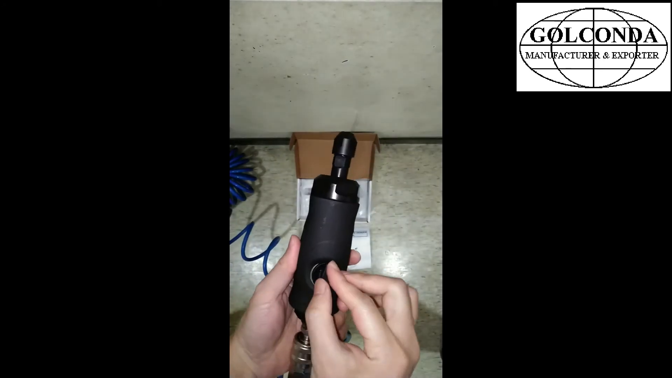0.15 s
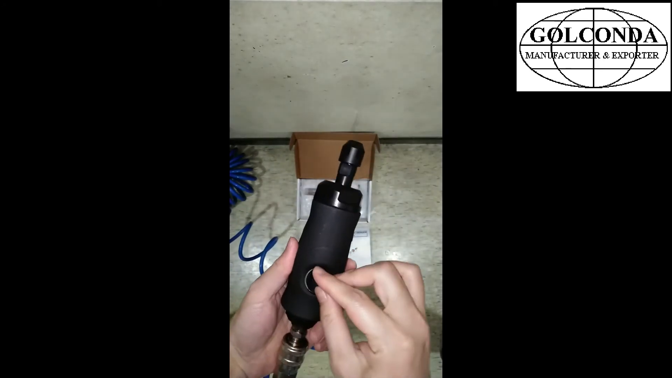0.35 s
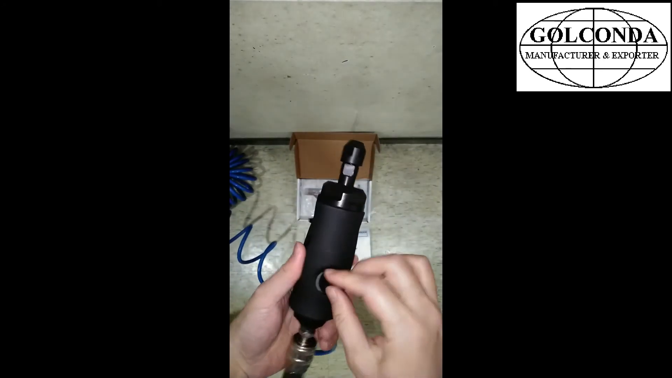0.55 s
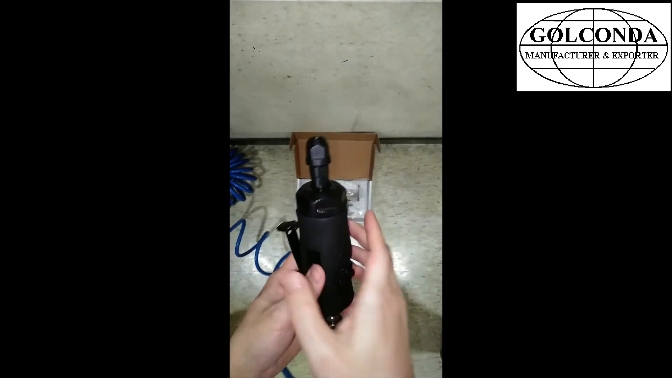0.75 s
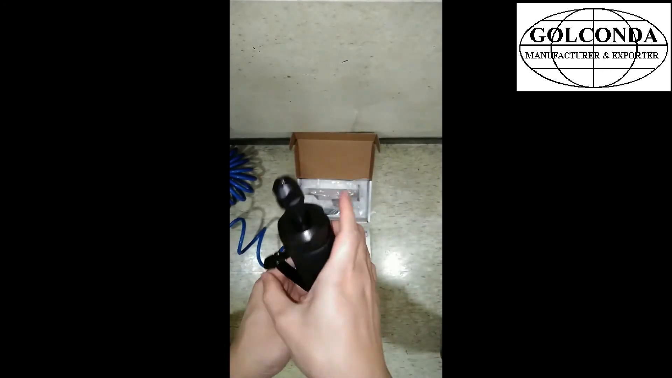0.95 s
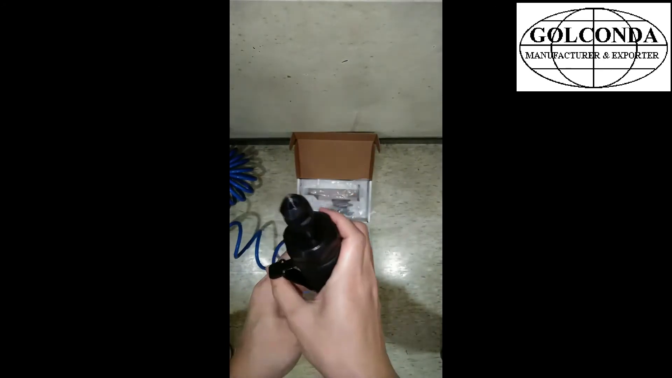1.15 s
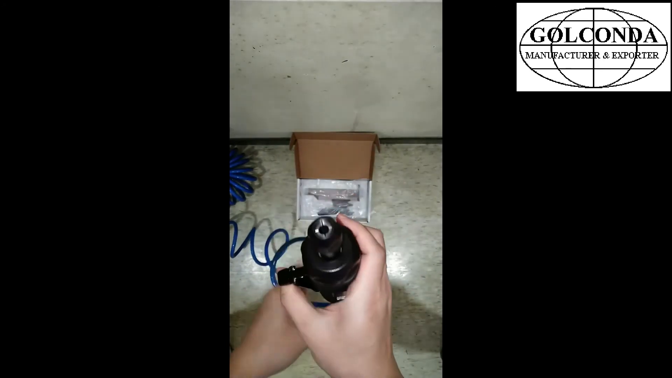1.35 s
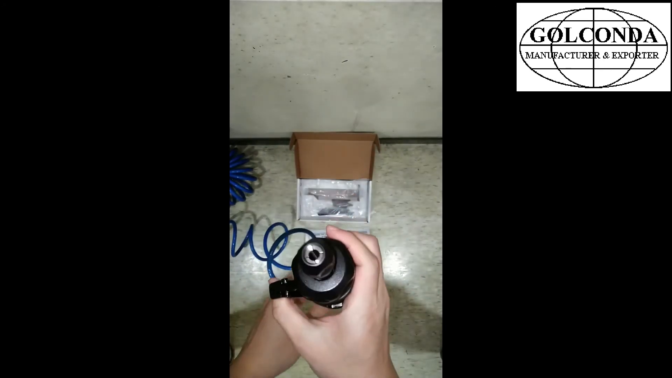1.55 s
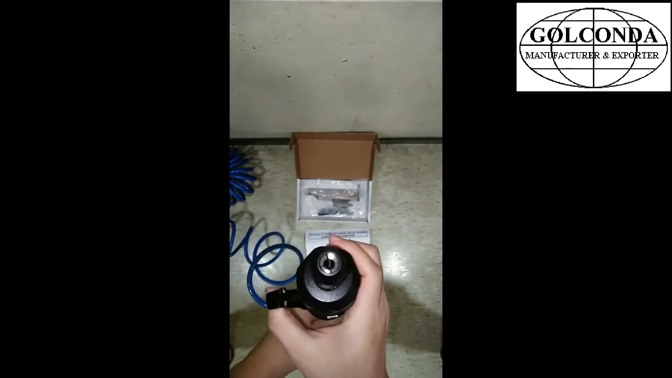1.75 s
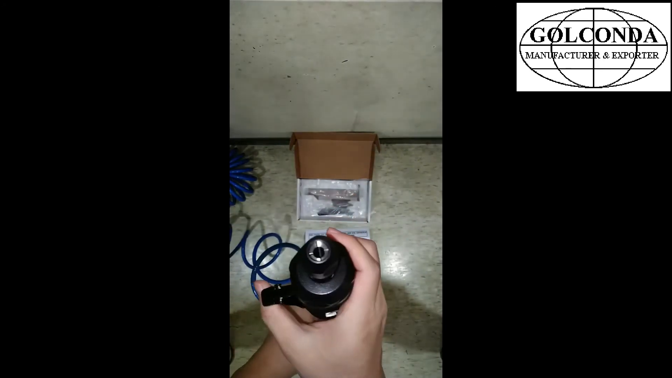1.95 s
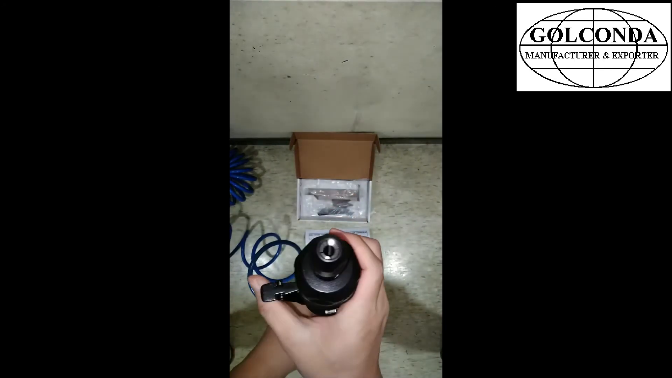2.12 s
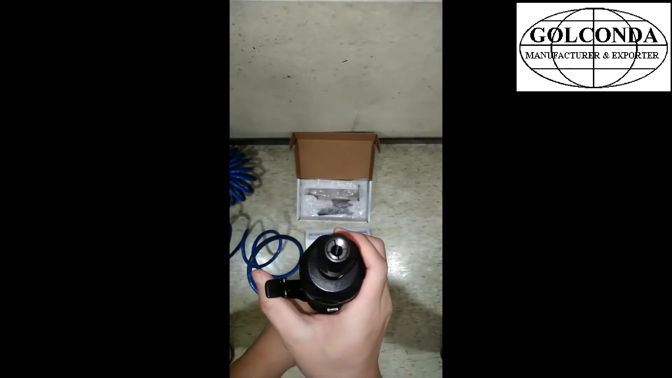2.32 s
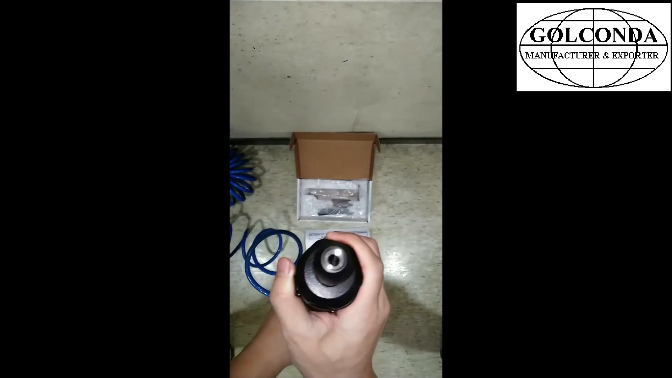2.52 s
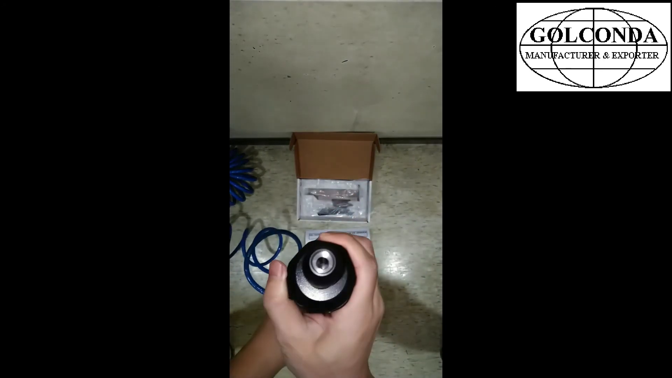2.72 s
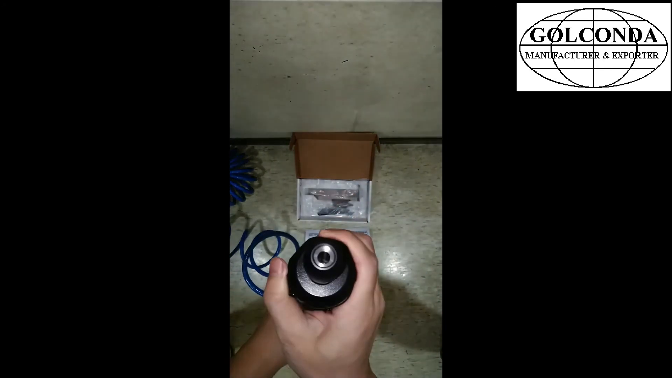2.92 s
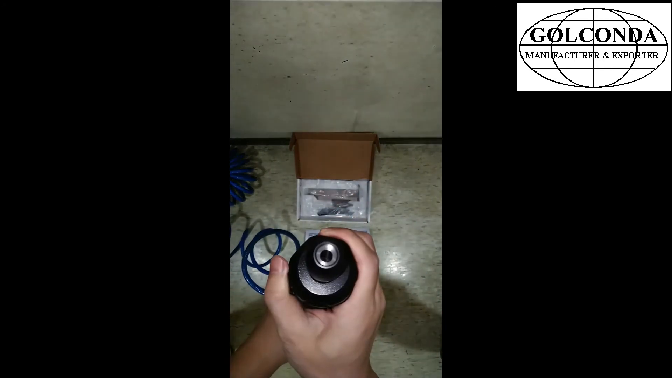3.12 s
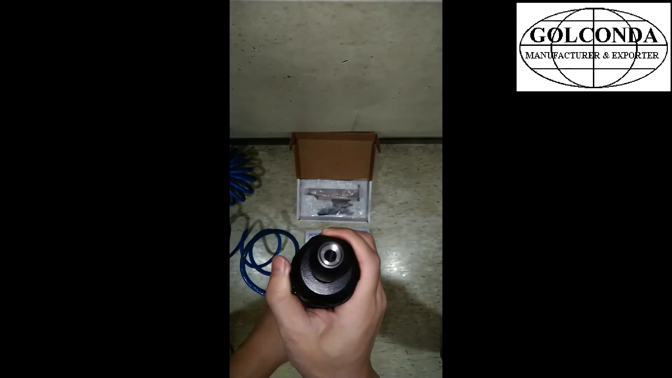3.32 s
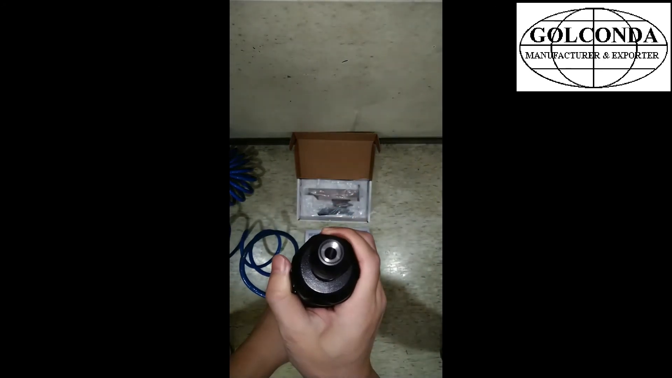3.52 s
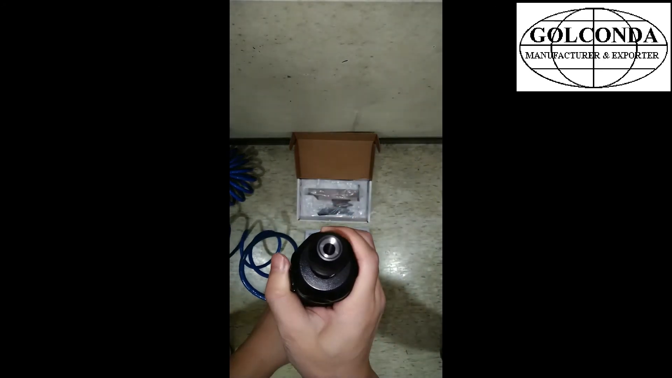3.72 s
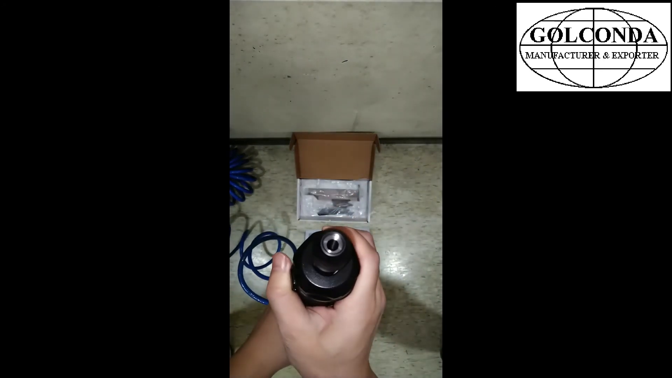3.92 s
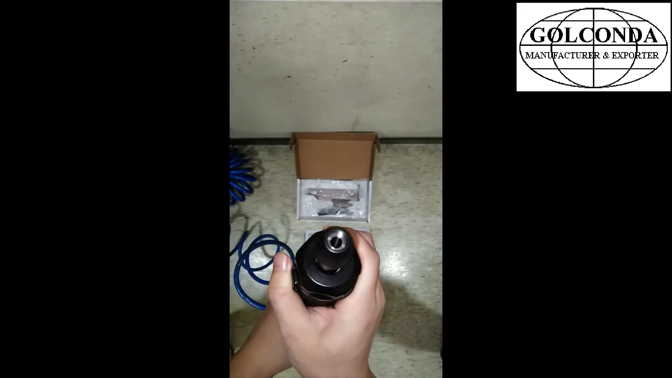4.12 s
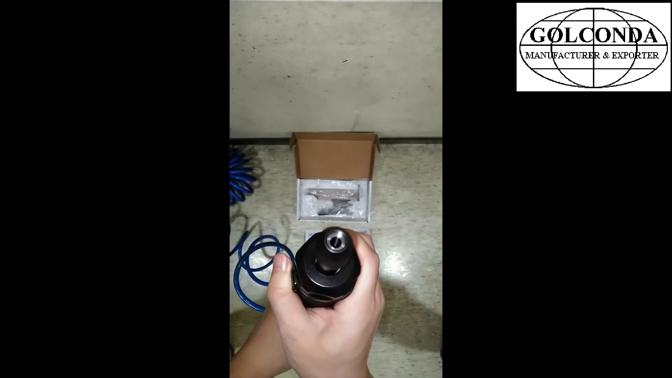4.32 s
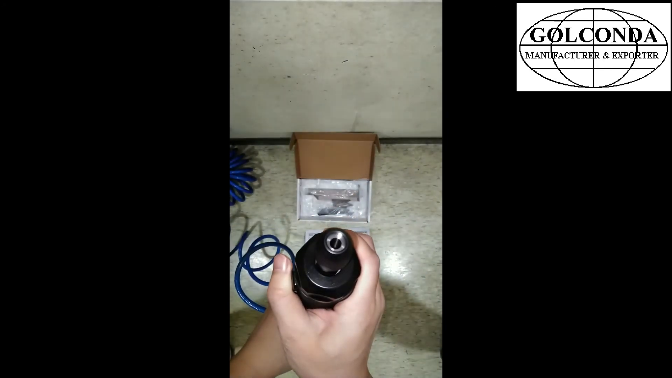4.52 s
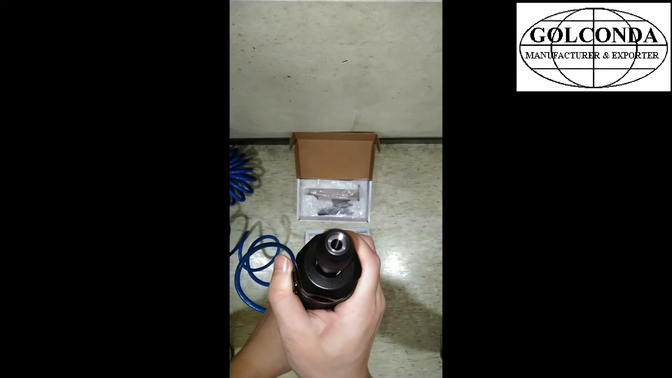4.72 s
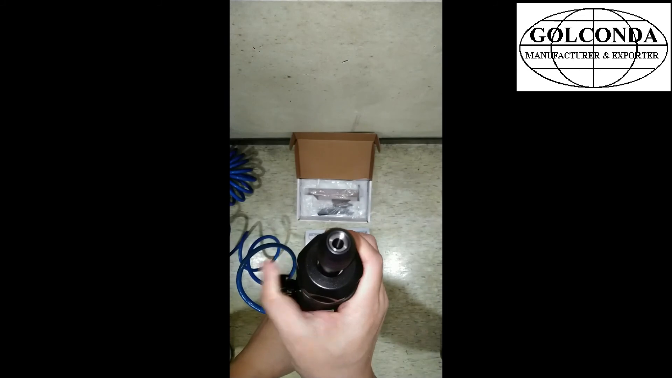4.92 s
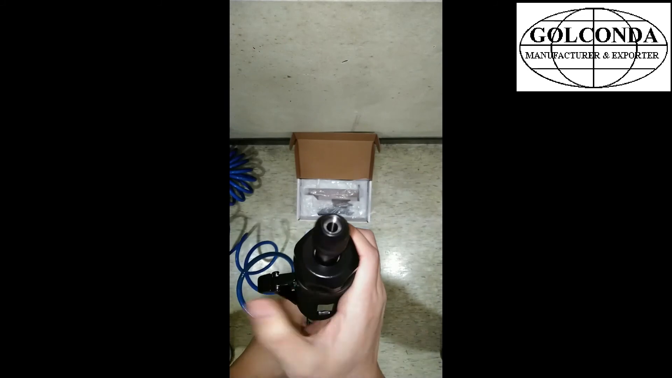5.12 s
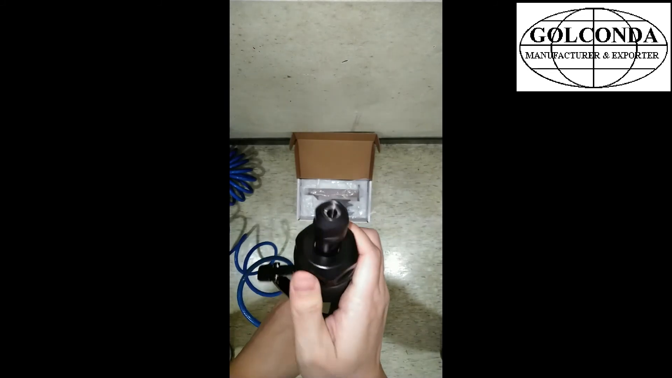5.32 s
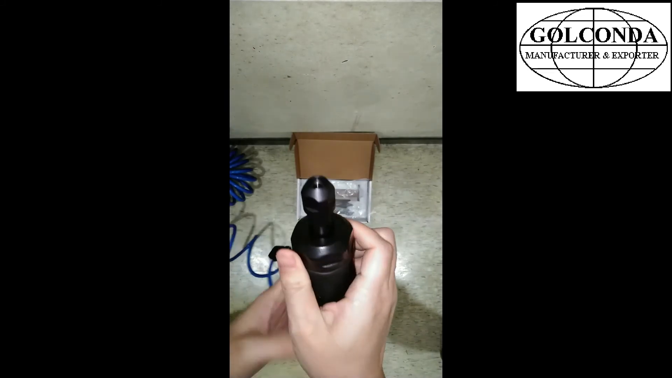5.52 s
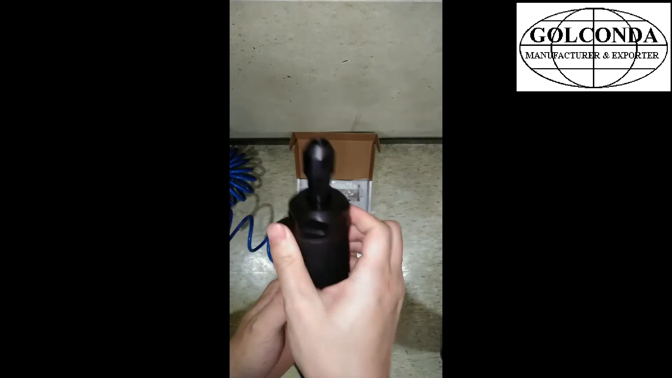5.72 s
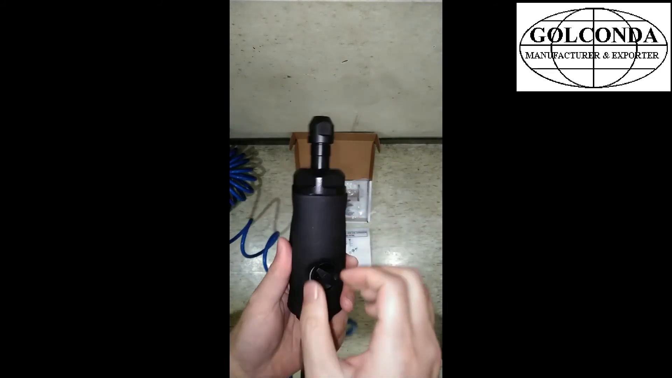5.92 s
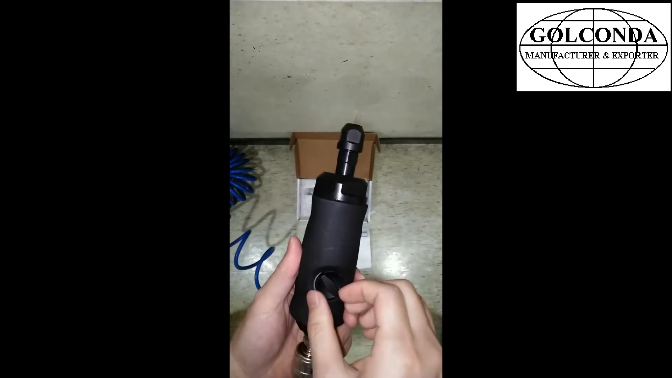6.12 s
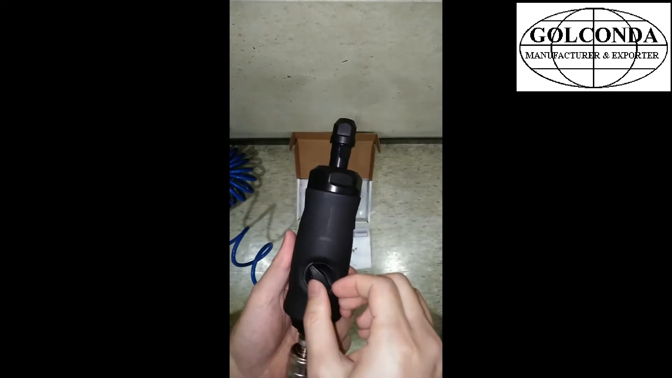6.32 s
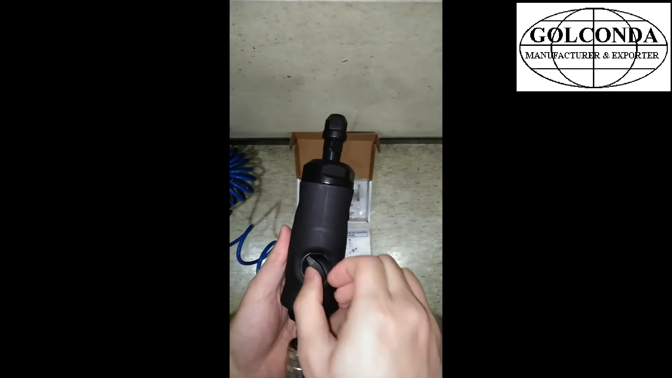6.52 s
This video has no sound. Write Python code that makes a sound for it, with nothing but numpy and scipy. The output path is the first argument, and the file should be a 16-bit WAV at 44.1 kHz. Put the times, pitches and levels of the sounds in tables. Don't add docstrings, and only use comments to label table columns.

```python
import sys
import numpy as np
from scipy import signal
from scipy.fft import rfft, irfft
from scipy.io import wavfile
from scipy.ndimage import uniform_filter1d

SR = 44100
rng = np.random.default_rng(int(sys.argv[2]) if len(sys.argv) > 2 else 0)


def gain_from_decibels(decibels):
    exponent = np.asarray(decibels, float) / 20
    return 10 ** exponent


def store_wav(level_fs):
    pcm = np.round(np.clip(np.atleast_2d(level_fs), -1, 1) * 32767)
    wavfile.write(sys.argv[1], SR, pcm.T.astype(np.int16))


N = 293596
TIME = np.arange(N) / SR
VANES = 4

# time_s, level_db
LEAK_LEVEL = [(0.0, -63.5), (0.53, -64), (0.8, -67), (2.23, -70), (2.4, -67.5), (5.3, -64.5), (5.43, -74),
              (5.68, -67.5), (5.96, -62), (6.45, -64.5), (6.66, -61.5)]
# pitch_hz, density_db
LEAK_COLOUR = [(2350, -44), (4000, -30), (5370, -14), (6800, -11.5), (7590, -9), (9290, -5.5), (11100, 1.5),
               (12800, -5.5), (15900, -5.5)]
# pitch_hz, density_db
RUMBLE_COLOUR = [(12, -16), (20, 1), (114, -9.5), (155, -8), (216, -11.5), (245, -11), (300, -19),
                 (341, -16), (476, -21), (615, -21), (814, -23), (3500, -37.5), (9000, -44.5), (11700, -67),
                 (19800, -120)]
# start_s, peak_db, centre_hz, width_hz, t60_s
TICKS = [(.615, -64, 9000, 8000, .03), (1.683, -45.5, 7000, 4000, 0.019), (1.684, -54.5, 6900, 3500, 0.17),
         (1.682, -57, 2600, 2400, .03), (2.438, -47, 800, 2000, 0.022), (5.043, -21.5, 8200, 1000, 0.05),
         (5.044, -20.5, 12400, 1507, 0.045), (5.043, -30, 5000, 5000, .06), (5.05, -29, 11000, 9000, 0.24),
         (5.57, -66, 9050, 6000, 0.034), (5.8, -58.5, 11000, 8040, .04)]
# pitch_hz, density_db
GRIP_COLOUR = [(20, -3), (48, 7), (90, -10), (200, -31)]
# time_s, level_db
AIR_ON = [
    (2.415, -63),
    (2.436, -27),
    (2.46, -23.5),
    (2.56, -23.5),
    (2.68, -27.5),
    (3.25, -26.3),
    (3.6, -28.3),
    (4.94, -28.5),
]
# time_s, level_db
AIR_OFF = [
    (4.975, -27.5),
    (5.001, -25),
    (5.012, -29),
    (5.022, -29),
    (5.033, -32),
    (5.046, -29),
    (5.07, -48),
    (5.1, -54),
    (5.14, -79),
]
# peak_s, first_tone_db, second_tone_db, thump_db, fall_db_per_s
SURGES = [
    (2.459, -19.5, -24, -41, 1700),
    (2.472, -27, -38, -28, 700),
    (2.485, -27, -35.5, -38, 150),
    (2.535, -28, -43, -61, 550),
    (5.001, -15.5, -15.5, -24, 560),
    (5.023, -23, -25.5, -24, 380),
    (5.045, -23, -31, -33, 520),
]
# pitch_hz, width_hz, depth_db
NULLS = [(770, 7, 6), (841, 22, 9), (1534, 16, 28), (1632, 22, 20), (1658, 17, 18), (2300, 25, 8),
         (3040, 30, 12), (3915, 30, 15), (4600, 80, 15), (5410, 20, 15), (7600, 50, 18), (5300, 12, 10),
         (9560, 70, 14), (9850, 60, 10)]
# vane_rate_multiple, level_db
SETTLED_OVERTONES = [(1, 0), (2, -3), (3, -17), (4, -7), (5, -13), (6, -11), (7, -7), (8, -4), (9, -17),
                     (10, -15), (11, -9), (12, -12), (13, -10), (14, -7), (15, -15), (16, -12), (17, -18),
                     (18, -19)]
# vane_rate_multiple, level_db
PEAK_OVERTONES = [(1, -3), (2, 0), (3, -10), (4, -10), (5, -16), (6, -12), (7, -12), (8, -15), (9, -28),
                  (10, -16), (11, -9), (12, -6), (13, -5), (14, -18), (15, -15), (16, -19), (17, -11),
                  (18, -15)]
OVERTONE_RATES = [770, 815]
# shaft_rate_multiple, level_db
SHAFT_RATTLE = [(1, -23.5), (2, -36.5), (3, -43.5), (5, -28.5), (6, -21.5), (7, -19.5), (9, -24.5),
                (10, -22.5), (11, -27.5), (13, -14.5), (14, -14.5), (15, -18.5)]
# pitch_hz, level_db
RATTLE_COLOUR = [(2500, -24.5), (3300, -21), (4500, -22), (7500, -15), (8800, -12.5), (10500, -6),
                 (12500, -13.5), (14000, -10), (15700, -24)]
# pitch_hz, density_db
HISS_COLOUR = [(150, -28), (400, -29), (620, -34), (900, -30.5), (1300, -23.5), (1800, -27.5), (2600, -22),
               (4200, -22), (6200, -17), (7600, -20), (10600, -9.5), (14700, -17.5), (15300, -21.5),
               (15900, -11.5)]
# pitch_hz, width_hz, level_db
PIPE = [(1681, 250, -8), (2090, 480, -2), (3460, 150, -15.5), (4278, 60, -7.5), (5020, 360, -9.5),
        (5790, 450, -7.5), (7203, 150, -15), (7900, 250, -15.5), (10500, 1200, -4.5), (5000, 6550, 0.5),
        (13500, 6000, -3.5)]


def lookup(spectrum, hz):
    f, db = np.transpose(spectrum)
    return np.interp(np.log(hz + 1), np.log(f), db, left=-90, right=-90)


def coloured(x, spectrum):
    y = irfft(rfft(x) * gain_from_decibels(lookup(spectrum, np.fft.rfftfreq(len(x), 1 / SR))), len(x))
    return y / np.sqrt(np.mean(y ** 2))


def band(x, hz, width_hz):
    return signal.lfilter(*signal.iirpeak(min(hz, .4 * SR), hz / width_hz, SR), x)


def double_band(x, hz, width_hz):
    y = band(band(x, hz, width_hz), hz, width_hz)
    return y / np.std(y)


def walk(rate_hz, size):
    knots = rng.standard_normal(int(size * rate_hz / SR) + 2)
    return 1.015 * np.interp(np.arange(size) * rate_hz / SR, np.arange(len(knots)), knots)


def patchy(x, depth_db, cells, hole_db=0.):
    z = signal.stft(x, nperseg=1024)[2]
    field = rng.standard_normal(z.shape)
    field = uniform_filter1d(field, cells[0], axis=0)
    field = uniform_filter1d(field, cells[1], axis=1)
    field = field / np.std(field)
    gain = gain_from_decibels(depth_db * field + hole_db * (field < -1))
    gain = gain / np.sqrt(np.mean(gain ** 2))
    return signal.istft(z * gain, nperseg=1024)[1][:len(x)]


def leak():
    s, db = np.transpose(LEAK_LEVEL)
    hiss = coloured(rng.standard_normal(N), LEAK_COLOUR)
    return gain_from_decibels(np.interp(TIME, s, db)) * patchy(hiss, 2.0, (24, 20))


def rumble():
    return gain_from_decibels(-56 + 0.32 * walk(3.1, N)) * coloured(rng.standard_normal(N), RUMBLE_COLOUR)


def ticks():
    out = np.zeros(N)
    age = np.arange(8000) / SR
    for s, db, hz, width_hz, t60 in TICKS:
        i = int(s * SR)
        knock = double_band(rng.standard_normal(len(age)), hz, width_hz)
        out[i:i + len(age)] += gain_from_decibels(db - 60 * age / t60) * knock
    return out


def grip():
    from_s, to_s, edge_db_per_s = 1.8, 2.4, 80
    outside_s = np.clip(np.maximum(from_s - TIME, TIME - to_s), 0, None)
    return gain_from_decibels(-58.5 - edge_db_per_s * outside_s) * coloured(rng.standard_normal(N), GRIP_COLOUR)


def speed():
    wind_up_s, wind_up_tau_s = 2.4705, .0182
    sag_from_s, sag_tau_s = 2.665, .42
    release_s, coast_half_s = 4.972, .06
    settled_hz, overshoot_hz, creep_hz_per_s = 763.0, 78.0, 2.5
    since = np.clip(TIME - sag_from_s, 0, None)
    fresh = np.exp(-since / sag_tau_s)
    wind_up = 1 / (1 + np.exp(-(TIME - wind_up_s) / wind_up_tau_s))
    coast = 1 / (1 + (np.clip(TIME - release_s, 0, None) / coast_half_s) ** 2)
    share = wind_up * coast
    full_hz = settled_hz + overshoot_hz * fresh - creep_hz_per_s * since
    return share * full_hz, fresh, 1 - share


def air_flow():
    s, db = np.transpose([*AIR_ON, *AIR_OFF])
    return np.interp(TIME, s, db, left=-120, right=-120)


def exhaust(angle, air_db, roar_db):
    size = len(angle)
    gust = 1 + 0.37 * np.cos(angle) + 0.11 * np.cos(VANES * angle)
    hiss = coloured(gust * rng.standard_normal(size), HISS_COLOUR)
    hiss = hiss * gain_from_decibels(air_db - 4.8 + 0.42 * walk(8.27, size))
    roar = double_band(gust * rng.standard_normal(size), 2670.0, 760.0)
    roar = roar * gain_from_decibels(air_db + roar_db + 0.5 * walk(12, size))
    return patchy(hiss + roar, 2.0, (4, 7), hole_db=-14)


def surges(time):
    rise_db_per_s = 1500
    levels = []
    for peak_s, *peaks_db, fall in SURGES:
        age = time - peak_s
        shape = np.minimum(rise_db_per_s * age, -fall * age)
        levels.append([db + shape for db in peaks_db])
    return np.max(levels, axis=0)


def standing(hz):
    grid = np.arange(0, 16000, .5)
    gain = np.ones(len(grid))
    for f, w, depth_db in NULLS:
        off2 = (grid - f) ** 2
        gain = gain * (off2 + (w * gain_from_decibels(-depth_db)) ** 2) / (off2 + w ** 2)
    return lambda k: 10 * np.log10(np.interp(k * hz, grid, gain))


def main_tone(multiple, angle, db, off):
    size = len(angle)
    ragged_db = .6 + 4 * off
    level = gain_from_decibels(db + ragged_db * walk(150, size))
    return level * np.sin(multiple * VANES * angle + multiple * .07 * walk(220, size))


def overtones(angle, hz, air_db, upper_db, thump_db, null_db):
    size = len(angle)
    sound = np.zeros(size)
    for k in range(3, 19):
        pattern = [table[k - 1][1] for table in (SETTLED_OVERTONES, PEAK_OVERTONES)]
        db = np.interp(hz, OVERTONE_RATES, pattern) + null_db(k)
        whine = gain_from_decibels(air_db + upper_db + db + 2.3 * walk(29.84, size))
        thump = gain_from_decibels(thump_db) / (1 + (k * hz / 1350) ** 6)
        phase = rng.uniform(0, 2 * np.pi) + .3 * walk(45, size)
        sound = sound + (whine + thump) * np.sin(k * VANES * angle + phase)
    return sound


def rotor_rattle(angle, shaft_hz, level_db):
    size = len(angle)
    low = {int(k): db + 4.0 for k, db in SHAFT_RATTLE}
    sound = np.zeros(size)
    for k in range(1, 83):
        if k % VANES == 0:
            continue
        if k in low:
            db = low[k]
        else:
            db = lookup(RATTLE_COLOUR, k * shaft_hz) + 3.5 * rng.standard_normal()
        level = gain_from_decibels(level_db + db + 2.3 * walk(22.1, size))
        sound = sound + level * np.sin(k * angle + rng.uniform(0, 2 * np.pi))
    return sound


def grinder():
    on = slice(int(2.3 * SR), int(5.3 * SR))
    hz, fresh, lag = (c[on] for c in speed())
    air_db = air_flow()[on]
    null_db = standing(hz)
    off = lag ** 0.45

    fade_db = -18 * lag + np.minimum(air_db + 30, 0)
    first_db = -30.6 + null_db(1) + fade_db
    second_db = -31.3 + null_db(2) - 22 * off + fade_db
    thump_db = -76 + fade_db
    steady = [first_db, second_db, thump_db]
    first_db, second_db, thump_db = np.maximum(steady, surges(TIME[on]))

    upper_db = -6.3 - 36 * off
    rattle_db = -9.3 - 8 * off - 3.5 * fresh
    roar_db = -18 + 9 * off - 24 * fresh * lag ** 2

    shaft_hz = np.clip(hz, 1, None) / VANES * (1 + .0004 * walk(39.88, len(hz)))
    angle = 2 * np.pi * np.cumsum(shaft_hz) / SR
    tones = main_tone(1, angle, first_db, off) + main_tone(2, angle, second_db, off)
    tones = tones + overtones(angle, hz, air_db, upper_db, thump_db, null_db)
    tones = tones + rotor_rattle(angle, shaft_hz, air_db + rattle_db)
    out = np.zeros(N)
    out[on] = np.sqrt(2) * tones + exhaust(angle, air_db, roar_db)
    return out


def drain():
    peak_s, peak_db, rise_db_per_s, fall_db_per_s2 = 5.08, -53, 300, 105
    air = rng.standard_normal(N)
    whistle = np.zeros(N)
    for hz, width_hz, db in PIPE:
        level = gain_from_decibels(db + 1.5 * walk(25, N)) / np.sqrt(width_hz)
        whistle = whistle + level * double_band_raw(air, hz, width_hz)
    age = TIME - peak_s
    db = peak_db + np.where(age < 0, rise_db_per_s * age, -fall_db_per_s2 * age ** 2)
    return gain_from_decibels(db) * whistle / np.std(whistle)


def double_band_raw(x, hz, width_hz):
    return band(band(x, hz, width_hz), hz, width_hz)


def room(x):
    t60_s = .29
    age = np.arange(int(.6 * SR)) / SR
    fade = gain_from_decibels(-60 * age / t60_s) * (age > .004)
    bright = rng.standard_normal(len(age))
    dull = signal.sosfilt(signal.butter(2, 1800, fs=SR, output="sos"), bright)
    tail = fade * (dull + (bright - dull) * 0.57 * gain_from_decibels(-40 * age / t60_s))
    tail = tail / np.sqrt(np.sum(dull ** 2 * fade ** 2))
    _, fresh, lag = speed()
    send_db = -12 + 10 * lag ** 0.3 * (1 - .5 * fresh)
    return x + gain_from_decibels(-11) * signal.fftconvolve(x * gain_from_decibels(send_db), tail)[:N]


def scene():
    heard = leak() + rumble() + grip() + room(ticks() + grinder()) + drain()
    return np.array([2 * heard, 0 * heard])


def low_pass(x):
    return signal.sosfilt(signal.butter(12, 16640, fs=SR, output="sos"), x)


def record(dry):
    mix = signal.sosfilt(signal.ellip(10, .2, 80, 15700, fs=SR, output="sos"), dry)
    return low_pass(mix)


dry = scene()
out = record(dry)
store_wav(out)
```